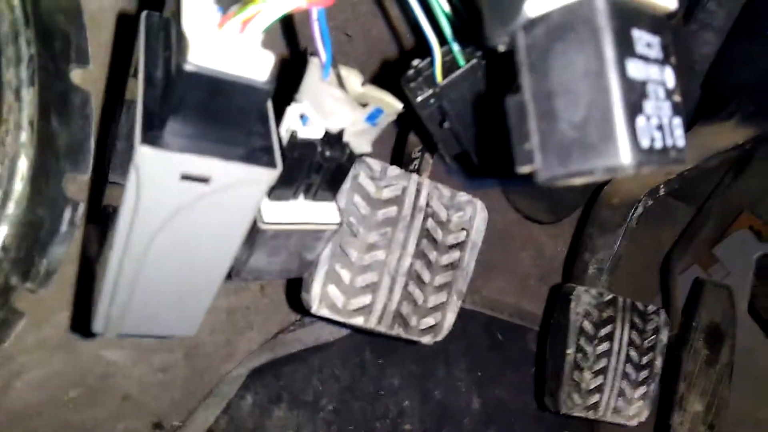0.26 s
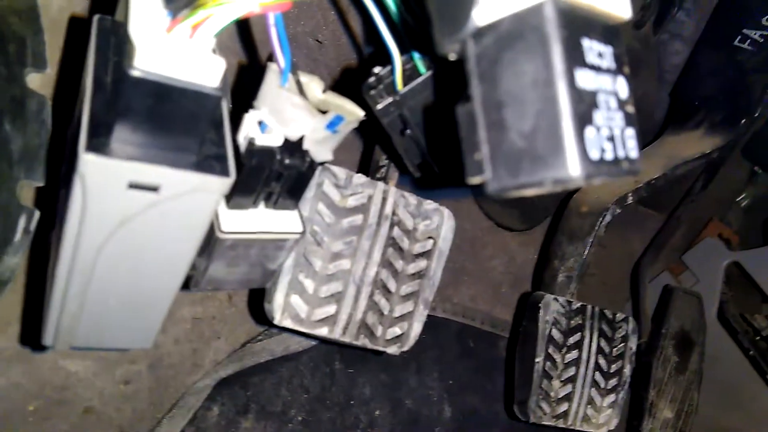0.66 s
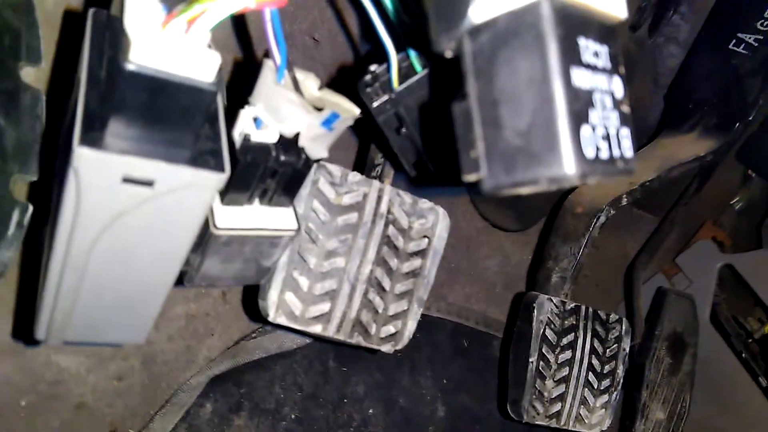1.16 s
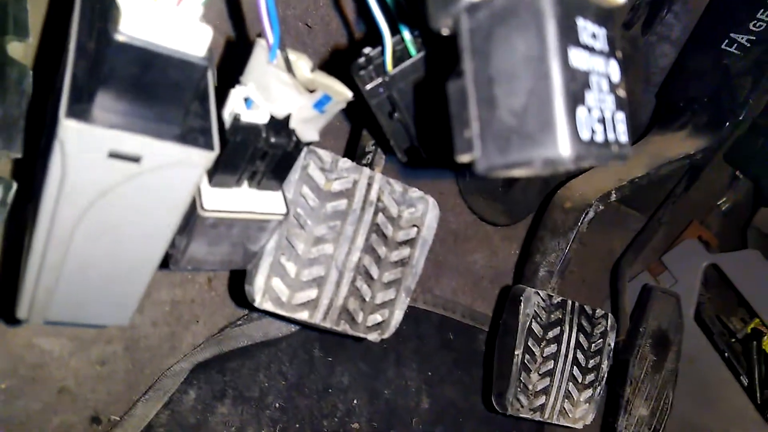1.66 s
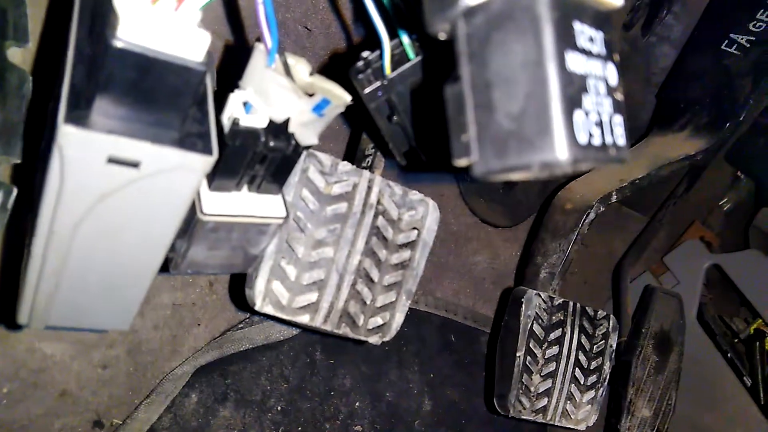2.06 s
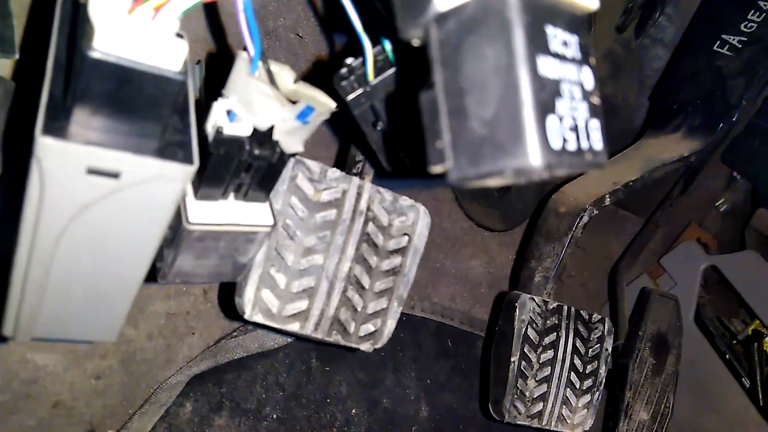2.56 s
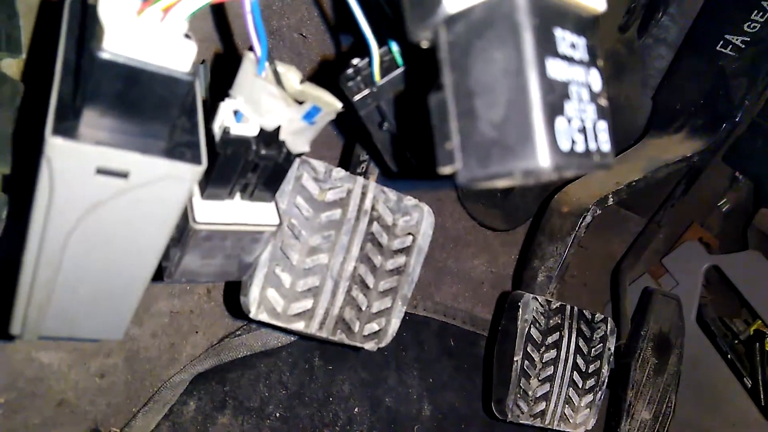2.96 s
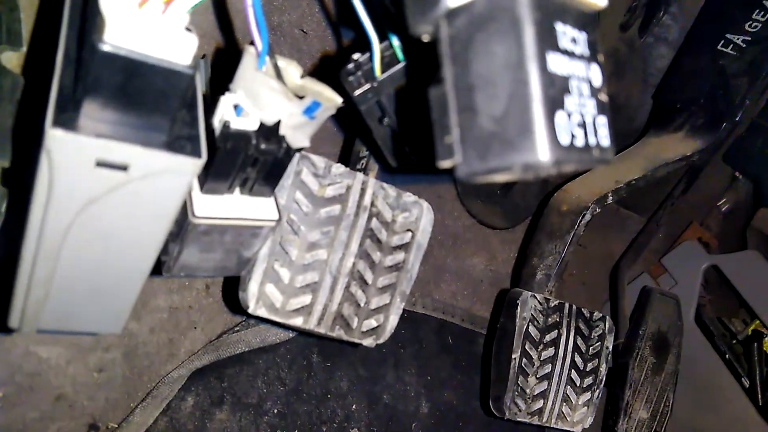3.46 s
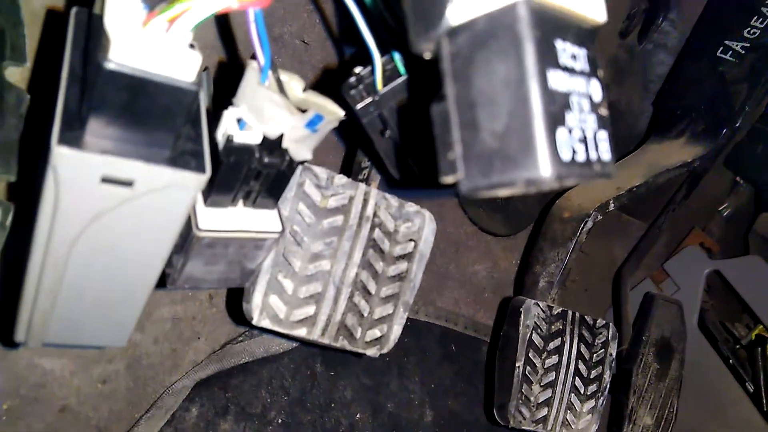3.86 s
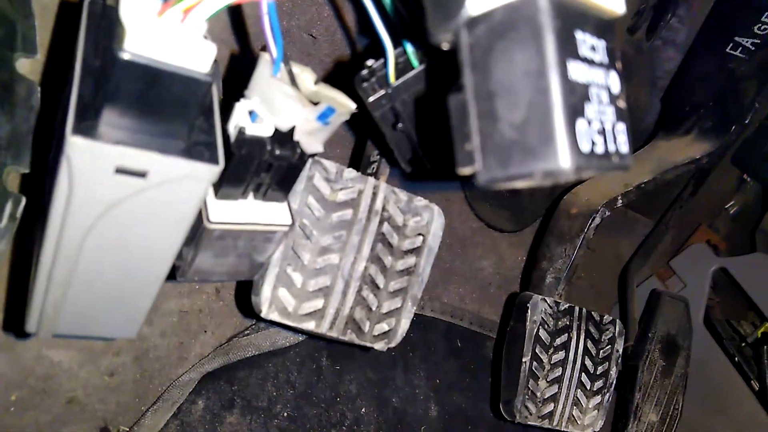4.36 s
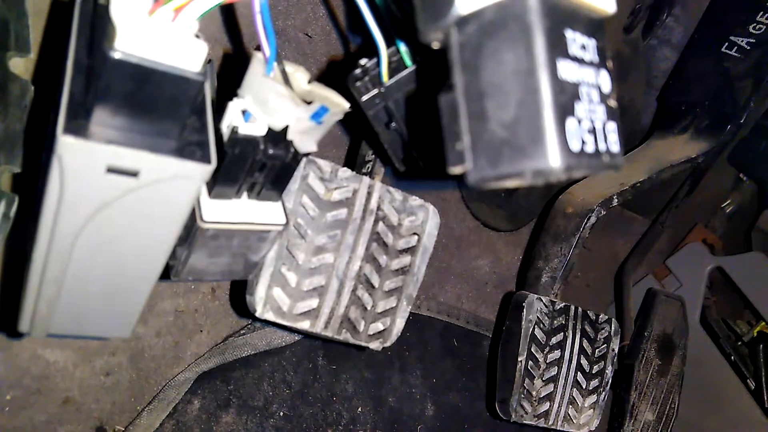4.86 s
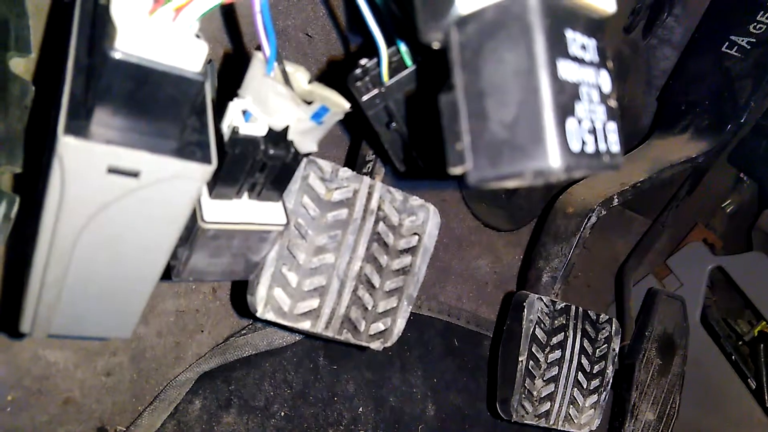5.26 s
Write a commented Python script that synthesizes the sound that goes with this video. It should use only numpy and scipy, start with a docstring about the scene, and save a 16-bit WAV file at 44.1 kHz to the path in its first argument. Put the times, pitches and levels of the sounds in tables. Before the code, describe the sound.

A bunch of keys clinks lightly and the lock barrel taps, then a relay snaps sharply. More jangling leads to a fuller clack, then a quick snap and clack, another such pair after busier key noise, and finally a lone snap and a late clack. Close microphone under the dashboard, small dry cabin, faint rumble and hiss, treble leaning to the right.

```python
"""In a car footwell, next to the relays under the dashboard, an ignition key is turned back and forth.
Relays pull in with a bright snap and short steel ring, or drop out with a fuller clack, panel thump and singing spring.
The lock knocks softly and the key bunch jangles as the hand turns; a faint rumble and hiss lie underneath.
Blows are shaped noise for the scattered impact plus decaying sine modes; hiss, rumble and skin rub are steady noise."""
import sys
import numpy as np
from scipy import signal
from scipy.fft import rfft, irfft, next_fast_len
from scipy.io import wavfile

SR = 44100
rng = np.random.default_rng(int(sys.argv[2]) if len(sys.argv) > 2 else 0)


def dump(signal):
    """Clip the signal to [-1, 1] and save it as 16-bit WAV at the path in sys.argv[1]."""
    limited = np.clip(np.atleast_2d(signal).T, -1, 1)
    pcm = np.round(limited * 32767).astype(np.int16)
    wavfile.write(sys.argv[1], SR, pcm)


N = 243811
SIZE = 16384  # samples in one hit with its tail
AGE = np.arange(SIZE) / SR  # seconds since the blow

# Background hiss and cabin rumble, relative spectra: (frequency [Hz], level [dB])
HISS_SPECTRUM = [(180, -38.5), (300, -6), (440, -1.5), (624, -3), (885, -6.5), (1170, -7), (1340, -13.5),
                 (1750, -10), (2740, -23.5), (3460, -13), (4910, -10.5), (9090, -4), (16000, -12)]
RUMBLE_SPECTRUM = [(12, -56.5), (20, -29), (39, -5.5), (70, 4), (107, -3), (216, -13), (255, -5.5),
                   (323, -26), (400, -24.5), (520, -57.5), (880, -120)]
# Hiss, left channel against right: (frequency [Hz], level [dB])
HISS_SIDE = [(60, -6), (130, -9), (290, 2.5), (640, -2.5), (1410, 2), (3100, 1.5), (6820, -3.5),
             (15000, -0.5)]
# Swell of the rumble, before the channel gains: (time [s], level [dB])
RUMBLE_SWELL = [(0.0, -65.5), (0.34, -63.5), (0.57, -72.5), (0.8, -74.5), (1.08, -68), (1.23, -67),
                (1.59, -71), (1.77, -70), (1.97, -65), (2.22, -73.5), (2.4, -70.5), (2.63, -59),
                (2.86, -68), (3.08, -70.5), (3.51, -62.5), (3.79, -65.5), (4.11, -68), (4.74, -67.5),
                (5.1, -74), (5.27, -70), (5.42, -63.5), (5.53, -70.5)]
# Rumble gain, one row each for left and right: (gain [dB])
RUMBLE_CHANNEL_DB = [
    [3],
    [8],
]
HISS_DB = -66

# The hand stirs the bunch: (full strength from [s], hold [s], jingle level [dB], finger rub level [dB])
HAND_MOVES = [(0.026, 0.08, -60, -59.5), (1.552, 0.18, -54, -62.5), (1.801, 0.076, -41.5, -55.5),
              (1.876, 0.045, -50, -55), (1.984, 0.035, -49.5, -60), (2.382, 0.083, -62, -64.5),
              (2.623, 0.08, -52.5, -60.5), (3.068, 0.15, -54, -70), (3.205, .15, -50, -64),
              (3.422, 0.042, -50, -57.5), (3.58, 0.092, -54, -58.5), (4.132, 0.064, -58, -69),
              (4.4, 0.26, -69.5, -73), (4.613, 0.19, -65.5, -72), (4.802, 0.085, -53, -60.5)]
# Skin on plastic, relative spectrum: (frequency [Hz], level [dB])
SKIN_SPECTRUM = [(200, -9), (650, -7.5), (1100, -1.5), (2000, -5), (2800, -0.5), (3600, -12), (7000, -6),
                 (15000, -22)]
STIR_ATTACK_S, STIR_T60_S = 0.0285, 0.14  # how fast a move builds and settles
RESTING_JINGLE_DB, RESTING_RUB_DB = -69.5, -78.5  # the hand just holds the key
CHATTER_DB, SKIN_DB = -6.5, -0.5  # balance within the finger rub

# Lock barrel and fob knock: (time [s], knock level [dB], thud level [dB])
LOCK_KNOCKS = [(0.056, -60, -67), (0.102, -43.5, -69), (0.122, -84, -51), (0.227, -49.5, -72),
               (0.406, -50.5, -61), (0.426, -46.5, -60), (0.649, -64, -93), (1.031, -75, -54.5),
               (1.238, -51, -52), (1.559, -54, -78), (1.605, -45.5, -64.5), (1.639, -54.5, -92),
               (1.68, -57, -85), (1.809, -52, -70), (1.834, -54.5, -53.5), (1.94, -42.5, -52.5),
               (2.05, -57, -71), (2.131, -61.5, -84), (2.392, -72.5, -61.5), (2.475, -54, -52),
               (2.566, -61, -58.5), (2.631, -58, -58), (3.292, -52.5, -54), (3.424, -41.5, -48.5),
               (3.444, -41.5, -65), (3.481, -42.5, -50.5), (3.636, -50, -60), (3.677, -62, -58),
               (3.866, -43.5, -50), (4.085, -58, -61.5), (4.499, -59, -54), (4.615, -48.5, -87),
               (4.626, -60, -91), (4.685, -58.5, -61), (4.8, -58.5, -58), (5.219, -58, -58)]
# Knock on hollow plastic and thud in the column, relative spectra: (frequency [Hz], level [dB])
KNOCK_SPECTRUM = [(200, -28.5), (700, -12.5), (1100, 5.5), (1400, -5.5), (2000, 2), (2900, 1), (3800, -17),
                  (7000, -10)]
THUD_SPECTRUM = [(30, -16), (80, 4.5), (170, -3), (290, -3), (500, -8.5), (900, -14), (2500, -42)]
# Modes of the hollow shroud: (frequency [Hz], relative level [dB], decay t60 [s])
SHROUD_MODES = [(1150, -4, .05), (1290, -1, .06), (1410, 0, .065), (1560, -3, .05), (1690, -7, .05),
                (2520, -8, .04), (2820, -5, .045)]
# A light tap lets the shroud ring, a thudding push damps it: (knock minus thud [dB], ring against knock [dB])
SHROUD_RING = [(0, -6.5), (15, 0.5), (30, 5.5)]

# A key strikes its neighbours or the column shroud:
# (time [s], level [dB], dull clack tilt [dB], sparkle tilt [dB], choking t60 [s])
KEY_HITS = [(0.061, -33.5, 5, -8, .11), (0.106, -32, 2, 2, 0.063), (0.233, -35, -6.5, -9, 0.1),
            (0.403, -26.5, 3, -9, 0.028), (0.528, -49, 2.5, -13, 0.08), (1.243, -42, 23, -7, 0.23),
            (1.269, -47.5, -2, -2, 0.057), (1.529, -27, -14.5, -5.5, 0.15), (1.558, -47, 10, -12, .06),
            (1.568, -36, -20, -26, 0.041), (1.607, -37, 2.5, -2, 0.23), (1.653, -47.5, -2, 1, .27),
            (1.682, -52, 16, -5, 0.37), (1.795, -42, -9, 6, .16), (1.818, -28, -3.5, 5, .33),
            (1.833, -39, 2, 6, 0.39), (1.862, -39, 5, 15, 0.24), (1.939, -32, 9, 2, 0.3),
            (1.986, -40.5, -7, 4, 0.19), (2.005, -43.5, 3, -3, 0.61), (2.242, -28, -13.5, -1.5, .075),
            (2.267, -41, -9, -20, 0.061), (2.567, -46.5, 10.5, -10, 0.082), (2.634, -33, 9.5, 6.5, 0.067),
            (2.656, -46, 0, 8, .17), (3.074, -36.5, -42, -8.5, .36), (3.099, -40, -19, 4, .17),
            (3.11, -33, -40, -11, 0.16), (3.151, -41.5, -3.5, -2, 0.17), (3.2, -32, -9, 5, 0.51),
            (3.216, -36.5, -13, -13, .35), (3.257, -33.5, -17, 0, 0.094), (3.292, -37, 6, -12, 0.29),
            (3.3, -27.5, 3.5, 5.5, 0.49), (3.314, -39, -6, -4, 0.35), (3.331, -38, -14, -13, 0.35),
            (3.424, -27.5, 7, -3, 0.063), (3.446, -42, 20, 1, 0.14), (3.474, -43, 4, -2, .15),
            (3.486, -32.5, 1, 1, .15), (3.518, -35, 1.5, 4, 0.092), (3.531, -43.5, 4, 2, 0.08),
            (3.64, -30.5, 0, -10, .19), (3.676, -46.5, 14, -8, .24), (3.775, -46.5, -5, -8, 0.27),
            (3.867, -28.5, 5, 1, 0.58), (3.88, -24.5, -17, -0.5, 1), (4.325, -47, -15, -7, .08),
            (4.414, -50.5, -4, -7.5, 0.16), (4.437, -28.5, -27, -8, 0.045), (4.512, -37.5, -4, -9, 0.041),
            (4.555, -39, -4.5, -10, .085), (4.63, -44, -5, -5, 0.096), (4.686, -44, 13, -4, 0.055),
            (4.803, -31, 4, -3.5, 0.1), (4.82, -23.5, -6.5, -8, 0.052), (4.859, -34.5, 4.5, 0, .15),
            (5.217, -39, 6, -5.5, 0.16)]
# Modes of the big keys: (frequency [Hz], relative level [dB], decay t60 [s])
KEY_MODES = [(5555, -25, .08), (7170, -16, .08), (7375, -17, .08), (7690, -19, .1), (7990, -11, .1),
             (8530, -2, .085), (8650, -2, .08), (8930, -8, .09), (9160, -8, .075), (9400, -13, .07),
             (9550, -7, .15), (10620, -13, .11), (11110, -20, .08), (11600, -7, .1), (12770, -20, .07),
             (13410, -10, .055), (14070, -24, .08), (14800, -12, .14), (15115, -23, .09), (15670, -4, .06)]
# Clink of touching keys, relative spectrum: (frequency [Hz], level [dB])
CLINK_SPECTRUM = [(200, -30), (700, -29), (1400, -25), (2300, -28.5), (4500, -20.5), (6500, -16),
                  (7700, -17), (8900, 1), (10200, -11), (11700, -18), (13000, -20.5), (15500, -24),
                  (16300, -22)]
# Keys, lock and hand, left channel against right: (frequency [Hz], level [dB])
KEY_SIDE = [(300, -1), (1400, -4), (4000, 0.5), (7000, -5.5), (9000, -24), (12000, -7), (15000, -7)]
REBOUND_S, REBOUND_SPREAD, REBOUND_LOSS_DB = 0.015, 0.4, 14.5  # a struck key falls back once; spread is a share

# Relays pull in: (time [s], snap level [dB], armature ring against snap [dB], tap level [dB])
PULL_INS = [(0.44, -15, -6, -41), (2.677, -11.5, 3.5, -33), (3.6468, -15, -7, -37.5),
            (4.8729, -16.5, 7.5, -30.5)]
# Bright snap and sharp tap, relative spectra: (frequency [Hz], level [dB])
SNAP_SPECTRUM = [(1500, -51.5), (3500, -25), (4800, -17.5), (6300, -17), (7100, -8), (7700, -1.5),
                 (9000, -4), (9700, -2.5), (10600, -6), (11700, -9.5), (12700, -17.5), (13800, -19),
                 (15400, -8.5), (16200, -29.5)]
TAP_SPECTRUM = [(40, -2.5), (100, 8), (250, -3.5), (1300, 1.5), (1700, -13.5), (2300, -4.5), (3100, -10.5),
                (3800, -32.5), (6000, -40.5)]
# Modes of the steel armature: (frequency [Hz], relative level [dB], decay t60 [s])
ARMATURE_MODES = [(8750, -6, .024), (9110, 0, .027), (9420, -11, .024)]
# Pull-in, left channel against right: (frequency [Hz], level [dB])
PULL_IN_SIDE = [(200, -26.5), (3000, -19), (5000, -19), (9000, -27.5), (15000, -20)]

# Relays drop out: (time [s], clack level [dB], panel thump level [dB], spring level [dB], deep boom gain [dB])
DROP_OUTS = [(1.9073, -11.5, -34.5, -61.5, -47.5), (2.742, -11, -35.5, -36.5, -62),
             (3.8396, -11.5, -34, -32.5, -53.5), (5.349, -12.5, -36, -37, -69)]
# Clack of the falling armatures, relative spectrum: (frequency [Hz], level [dB])
CLACK_SPECTRUM = [(60, -26), (200, -14.5), (900, -16.5), (2200, -15), (3300, -16), (4500, -11.5),
                  (5700, -11.5), (7000, 0), (8000, -1.5), (9400, -0.5), (10500, -7.5), (12800, -18),
                  (14800, -11), (16200, -24)]
# Modes of relay cases, panel, return spring and whole dashboard:
# (frequency [Hz], relative level [dB], decay t60 [s])
CASE_MODES = [(900, -16, .025), (1020, -14, .02), (1340, -17, .03), (2250, -20, .03), (2800, -18, .035),
              (4250, -17, .03), (5485, -11, .035), (5715, -13, .03), (5930, -15, .025), (6290, -11, .035),
              (6530, -6, .026), (6868, -2, .028), (7400, -2, .03), (7805, -4, .03), (8255, -4, .032),
              (8770, 0, .035), (9610, 0, .032), (10450, -1, .035), (11670, -10, .04)]
PANEL_MODES = [(83.6, -13.5, 0.38), (130, -5.5, 0.087), (174.4, -3, 0.17), (205, -5.5, 0.11),
               (273, -7, 0.094), (448, -3, 0.039), (826, -3.5, 0.03)]
SPRING_MODES = [(6735, -20, .26), (7165, -22, .25), (7499, -23, .35), (8549, -6, .16), (8900, -10, .16),
                (9351, 0, .19), (9566, -10, .16), (9725, -15, .14), (13720, -29, .35)]
DASHBOARD_MODES = [(34, -2, .2), (60, 0, 0.31)]
# Drop-out, left channel against right: (frequency [Hz], level [dB])
DROP_OUT_SIDE = [(150, -8), (700, -5.5), (1300, -2.5), (3000, -3.5), (5500, -5), (7000, -11.5),
                 (9000, -17.5), (12000, -7), (15000, -6)]

# The swinging bunch sets the wire key ring singing faintly
WIRE_S, WIRE_HZ, WIRE_DB, WIRE_T60_S = 4.9, 2510, -71.5, 0.77

# Two output bands: how far the lower one leads, where they cross, and the top cutoff
LOW_BAND_LEAD_S, SPLIT_HZ, CUTOFF_HZ = 0.0064, 3750, 15900


def from_db(db):
    """Decibels to an amplitude factor."""
    return 10 ** (np.asarray(db) / 20)


def at_hz(points, hz):
    """A spectrum read on a log-frequency axis."""
    point_hz, point_db = np.transpose(points)
    return np.interp(np.log(hz + 1e-9), np.log(point_hz), point_db)


def in_time(rows):
    """The columns of a curve at every sample."""
    s, *columns = np.transpose(rows)
    return [np.interp(np.arange(N) / SR, s, column) for column in columns]


def add(out, s, sound):
    """Mix a stereo sound in from time s."""
    i = max(round(s * SR), 0)
    out[:, i:i + SIZE] += sound[:, :N - i]


def colour(x, spectrum):
    """Causal (minimum-phase) filter with the given spectrum, by folding its cepstrum."""
    n = next_fast_len(x.shape[-1] + SIZE, True) // 2 * 2
    gain = from_db(at_hz(spectrum, np.fft.rfftfreq(n, 1 / SR)))
    cepstrum = irfft(np.log(gain))
    cepstrum[1:n // 2] *= 2
    cepstrum[n // 2 + 1:] = 0
    response = np.exp(rfft(cepstrum))
    return irfft(rfft(x, n) * response, n)[..., :x.shape[-1]]


def split(x, kind):
    """The part of a sound below ("low") or above ("high") a steep crossover."""
    n = next_fast_len(x.shape[-1] + 2048, True)
    hz = np.fft.rfftfreq(n, 1 / SR)
    high_share = np.clip(0.5 + (hz - SPLIT_HZ) / 400, 0, 1)
    high = irfft(rfft(x, n) * high_share, n)[..., :x.shape[-1]]
    return high if kind == "high" else x - high


def at_level(x, db):
    """Set the rms of a hit's first 10 ms in the right channel."""
    rms = np.sqrt(np.mean(x[-1, :SR // 100] ** 2) + 1e-20)
    return x * from_db(db) / rms


def placed(x, side):
    """Colour the left channel, which is shaded from the source."""
    return np.array([colour(x[0], side), x[1]])


def noise_pair(alike, size):
    """Two noises with the given correlation; the left leads by 16 samples."""
    mid, side = rng.standard_normal((2, size))
    c = np.clip(alike, 0, 1)
    shared = np.sqrt((1 + c) / 2) * mid
    apart = np.sqrt((1 - c) / 2) * side
    return np.array([np.roll(shared + apart, -16), shared - apart])


def scatter(rise_s, t60, tail_db, tail_t60, alike):
    """A blow arrives as dense reflections from panels and pedals, then a faint cabin tail."""
    swell = np.sin(np.pi / 2 * np.minimum(AGE / max(rise_s, 1e-5), 1)) ** 1.5
    late = np.maximum(AGE - rise_s, 0)
    decay = from_db(-60 * late / t60) + from_db(tail_db - 60 * late / tail_t60)
    return noise_pair(alike, size=SIZE) * swell * decay


def ring(modes, vary_db, detune, rise_s):
    """Struck modes, each with a new strength on every blow and its own phase in each channel."""
    hz, db, t60 = np.transpose(modes)
    hz = hz * (1 + detune * rng.standard_normal(len(hz)))
    strengths = from_db(db + vary_db * rng.standard_normal(len(hz)))
    phases = np.exp(2j * np.pi * rng.random((2, len(hz))))
    age = AGE[AGE < t60.max()]
    waves = np.exp(np.outer(2j * np.pi * hz - np.log(1000) / t60, age))  # ln 1000 is 60 dB
    sound = ((strengths * phases) @ waves).imag * (1 - np.exp(-age / rise_s))
    return np.pad(sound, [(0, 0), (0, SIZE - len(age))])


def steady(spectrum, alike, grain_db, count):
    """Coloured stereo noise of rms 1; its strength glides through count random levels a second."""
    points = N * count // SR + 2
    grains = np.interp(np.arange(N) * count / SR, np.arange(points), rng.standard_normal(points))
    x = colour(noise_pair(alike, size=N) * from_db(grain_db * grains), spectrum)
    return x / x.std()


def background():
    """Hiss and cabin rumble: coloured noises, the rumble uneven and following its swell."""
    hiss = placed(steady(HISS_SPECTRUM, alike=0.035, grain_db=1.0, count=1), HISS_SIDE)
    swell_db, = in_time(RUMBLE_SWELL)
    rumble = steady(RUMBLE_SPECTRUM, alike=0.55, grain_db=5.0, count=25)
    return from_db(HISS_DB) * hiss + from_db(swell_db + RUMBLE_CHANNEL_DB) * rumble


def stirring():
    """Gains of the jingle and the finger rub: each move builds, holds and settles back to rest."""
    t = np.arange(N) / SR
    jingling, rubbing = from_db(RESTING_JINGLE_DB), from_db(RESTING_RUB_DB)
    for s, hold_s, jingle_db, rub_db in HAND_MOVES:
        build = np.clip(1 + (t - s) / STIR_ATTACK_S, 0, 1)
        settle = from_db(-60 * np.maximum(t - s - hold_s, 0) / STIR_T60_S)
        jingling = np.maximum(jingling, build * settle * from_db(jingle_db))
        rubbing = np.maximum(rubbing, build * settle * from_db(rub_db))
    return jingling, rubbing


def key_ring():
    """The bunch rings once: big-key modes in a new balance, plus overtones of whichever small parts met."""
    overtone_hz = np.concatenate([rng.uniform(9500, 15800, size=7), rng.uniform(6800, 9500, size=3)])
    overtones = [(hz, -14, 0.07) for hz in overtone_hz]
    return ring(KEY_MODES + overtones, vary_db=5, detune=0.002, rise_s=0.002)


def jingle(per_s):
    """Many tiny, quickly choked touches, per_s a second in each of six layers; right channel rms 1."""
    out = 0
    for _ in range(6):
        touches = (rng.random(N) < per_s / SR) * rng.standard_normal(N)
        burst = scatter(rise_s=0.0019, t60=0.025, tail_db=-32.0, tail_t60=0.08, alike=0.23)
        clink = colour(burst, CLINK_SPECTRUM)
        touch = at_level(clink, 0) + at_level(key_ring(), 0)
        touch = touch * from_db(-60 * AGE / 0.08)
        out = out + signal.oaconvolve(touches[None], touch, axes=1)[:, :N]
    return out / out[1].std()


def chatter(per_s):
    """The fob taps the hollow shroud, per_s times a second in each of four layers; right channel rms 1."""
    out = 0
    for _ in range(4):
        taps = (rng.random(N) < per_s / SR) * rng.standard_normal(N)
        shroud = ring(SHROUD_MODES, vary_db=3, detune=0.02, rise_s=0.002)
        out = out + signal.oaconvolve(taps[None], shroud, axes=1)[:, :N]
    return out / out[1].std()


def hand():
    """Keys stir, the fob chatters and fingers rub on the column: dense small touches and grainy noise."""
    jingling, rubbing = stirring()
    skin = steady(SKIN_SPECTRUM, alike=0.37, grain_db=6.5, count=120)
    rub = from_db(CHATTER_DB) * chatter(per_s=36) + from_db(SKIN_DB) * skin
    return placed(jingling * jingle(per_s=19) + rubbing * rub, KEY_SIDE)


def lock():
    """Hollow plastic knocks from the lock barrel, with a thud through the steering column."""
    out = np.zeros((2, N))
    for s, knock_db, thud_db in LOCK_KNOCKS:
        burst = scatter(rise_s=0.00033, t60=0.09, tail_db=-28.0, tail_t60=0.13, alike=0.046)
        shroud = ring(SHROUD_MODES, vary_db=4, detune=0.03, rise_s=0.002)
        ring_db = np.interp(knock_db - thud_db, *np.transpose(SHROUD_RING))
        knock = at_level(colour(burst, KNOCK_SPECTRUM), 0) + at_level(shroud, ring_db)
        push = scatter(rise_s=0.0032, t60=0.015, tail_db=-13, tail_t60=0.17, alike=1.0)
        thud = colour(push, THUD_SPECTRUM)
        add(out, s, at_level(knock, knock_db) + at_level(thud, thud_db))
    return placed(out, KEY_SIDE)


def key_touch(db, clack_db, sparkle_db, choke_t60):
    """A scattered clink plus the keys' own modes, choked as the keys settle against each other."""
    burst = scatter(rise_s=0.002, t60=0.055, tail_db=-27, tail_t60=0.12, alike=0.15)
    clink = colour(burst, CLINK_SPECTRUM)
    # a key that clacks against plastic rings less
    free_db = np.clip(2.5 - 0.35 * clack_db, -8, 5)
    touch = at_level(clink, 0) + at_level(key_ring(), free_db)
    touch = touch * from_db(-60 * np.maximum(AGE - 0.004, 0) / choke_t60)
    # (frequency [Hz], level [dB])
    tilt = [(1500, 0.25 * clack_db), (4000, 0.94 * clack_db), (6300, 0.57 * clack_db),
            (7800, 0.011), (10300, 0), (12000, sparkle_db)]
    return at_level(colour(touch, tilt), db)


def keys():
    """Each key that strikes falls back and rebounds once, more softly."""
    out = np.zeros((2, N))
    for s, db, *manner in KEY_HITS:
        add(out, s - 0.0005, key_touch(db, *manner))
        flight_s = REBOUND_S * (1 + REBOUND_SPREAD * rng.uniform(-1.1, 1))
        add(out, s + flight_s, key_touch(db - REBOUND_LOSS_DB, *manner))
    return placed(out, KEY_SIDE)


def pull_in():
    """The armature slams on the core: one sharp tap, a bright snap and a short steel ring."""
    out = np.zeros((2, N))
    for s, snap_db, ring_db, tap_db in PULL_INS:
        snap = scatter(rise_s=0.0004, t60=0.026, tail_db=-27, tail_t60=0.085, alike=0.64)
        snap[:, 0] += 6.0  # the direct sound, ahead of the reflections
        tap = scatter(rise_s=0.0003, t60=0.01, tail_db=-12.5, tail_t60=0.046, alike=0.23)
        tap[:, 0] += 20
        steel = ring(ARMATURE_MODES, vary_db=2.0, detune=0.0023, rise_s=0.0013)
        # the contacts meet just before the core
        graze = scatter(rise_s=0.00042, t60=0.02, tail_db=-38, tail_t60=0.05, alike=0.4)
        add(out, s - 0.003, at_level(colour(graze, SNAP_SPECTRUM), snap_db - 21.5))
        add(out, s, at_level(colour(snap, SNAP_SPECTRUM), snap_db))
        add(out, s, at_level(steel, snap_db + ring_db))
        add(out, s, at_level(colour(tap, TAP_SPECTRUM), tap_db))
    return placed(out, PULL_IN_SIDE)


def drop_out():
    """Armatures fall back in one dense clack and rattle their cases; the panel booms and a spring sings on."""
    out = np.zeros((2, N))
    for s, clack_db, thump_db, spring_db, boom_db in DROP_OUTS:
        bright = scatter(rise_s=0.0075, t60=0.025, tail_db=-27, tail_t60=0.13, alike=0.5)
        dull = scatter(rise_s=0.002, t60=0.062, tail_db=-28, tail_t60=0.21, alike=0.37)
        burst = split(dull, "low") * from_db(-2.57) + split(bright, "high")
        add(out, s - 0.0012, at_level(colour(burst, CLACK_SPECTRUM), clack_db))
        case = ring(CASE_MODES, vary_db=1.8, detune=0.004, rise_s=0.004)
        add(out, s + 0.004, at_level(case, clack_db - 6))
        # [[1, 1]]: long waves reach both channels alike
        panel = ring(PANEL_MODES, vary_db=0.14, detune=0.005, rise_s=0.0016)[[1, 1]]
        add(out, s + 0.002, at_level(panel, thump_db))
        spring = ring(SPRING_MODES, vary_db=1.5, detune=0.0002, rise_s=0.002)
        add(out, s + 0.005, at_level(spring, spring_db))
        boom = ring(DASHBOARD_MODES, vary_db=2.0, detune=0.02, rise_s=0.003)[[1, 1]]
        add(out, s, from_db(boom_db) * boom)
    return placed(out, DROP_OUT_SIDE)


def key_wire():
    """One thin, slowly decaying tone from the wire ring that holds the keys."""
    out = np.zeros((2, N))
    tone = ring([(WIRE_HZ, 0, WIRE_T60_S)], vary_db=0, detune=0, rise_s=0.0027)
    add(out, WIRE_S, at_level(tone, WIRE_DB))
    return out


def scene():
    """Relays, keys, lock and hand over the quiet cabin."""
    return background() + hand() + lock() + keys() + pull_in() + drop_out() + key_wire()


def record(dry):
    """The lower band comes a few milliseconds ahead of the treble; peaks are rounded and the top is cut."""
    lead = round(LOW_BAND_LEAD_S * SR)
    low = np.pad(split(dry, "low")[:, lead:], [(0, 0), (0, lead)], "reflect")
    ceiling = 0.72
    rounded = ceiling * np.tanh((low + split(dry, "high")) / ceiling)
    top_cut = signal.ellip(10, 0.3, 80, CUTOFF_HZ, fs=SR, output="sos")
    return signal.sosfilt(top_cut, rounded)


dry = scene()
out = record(dry)
dump(out)
```